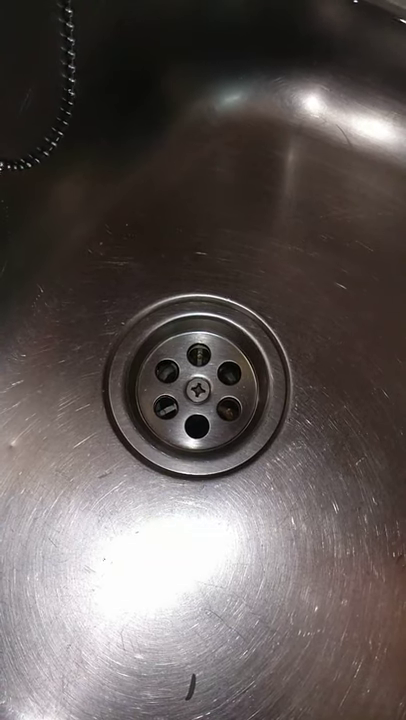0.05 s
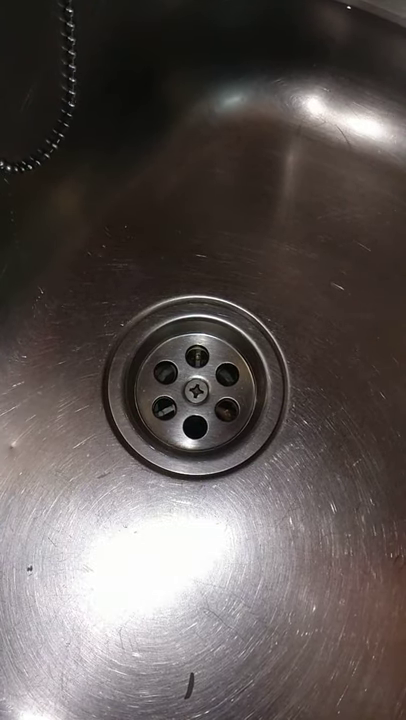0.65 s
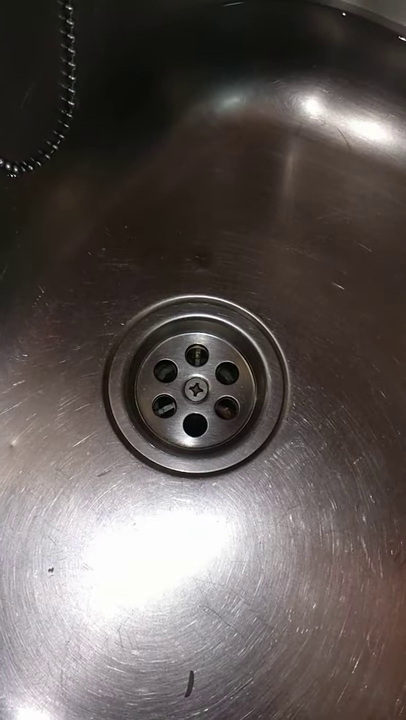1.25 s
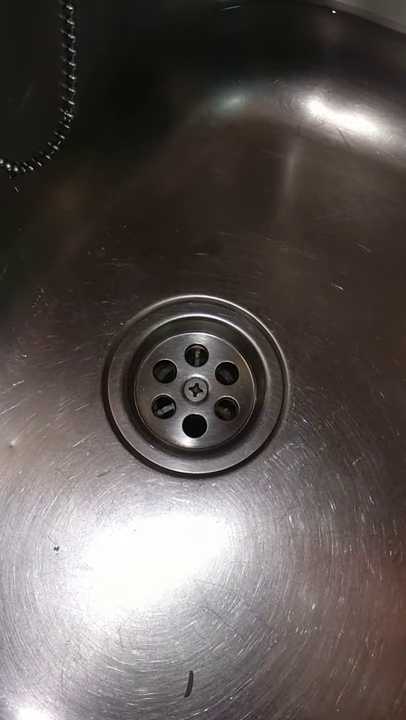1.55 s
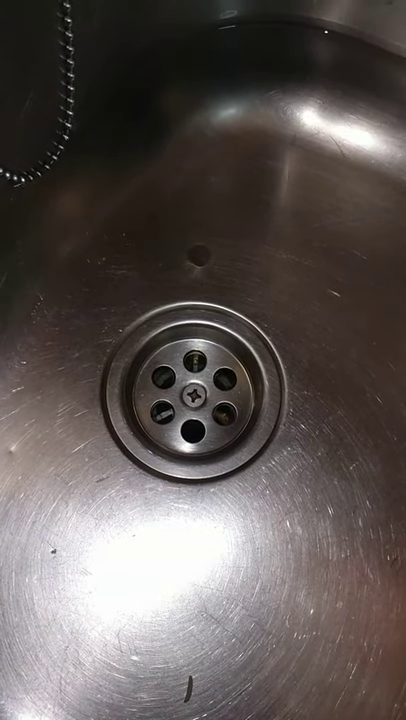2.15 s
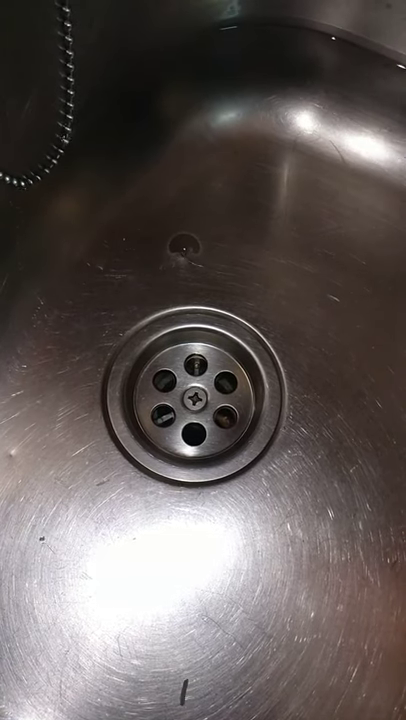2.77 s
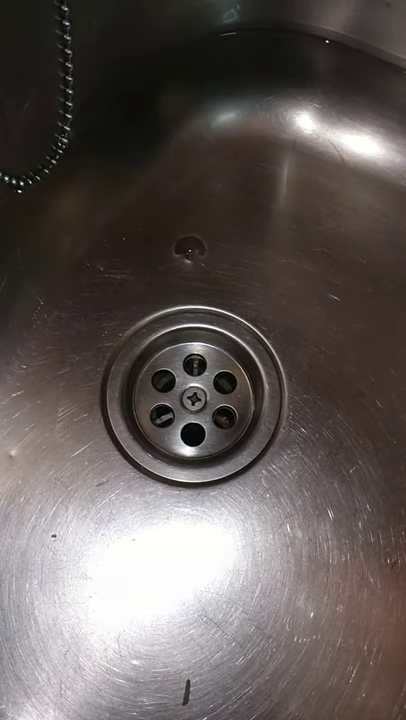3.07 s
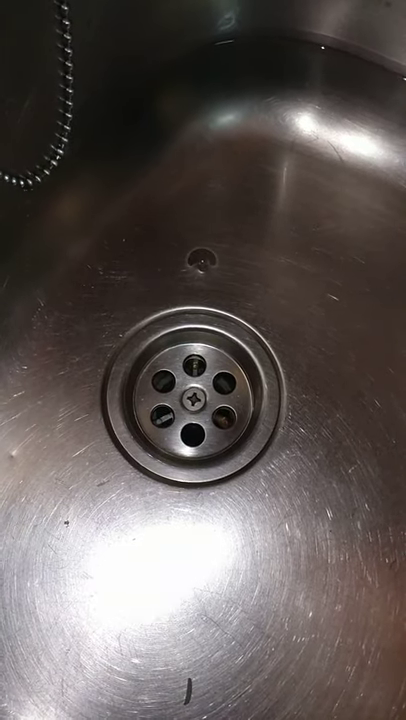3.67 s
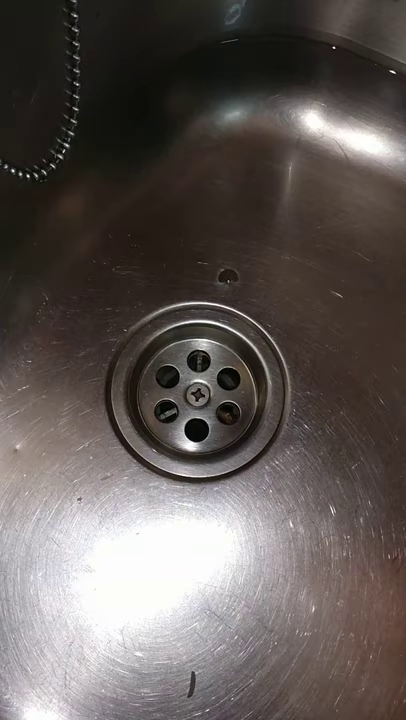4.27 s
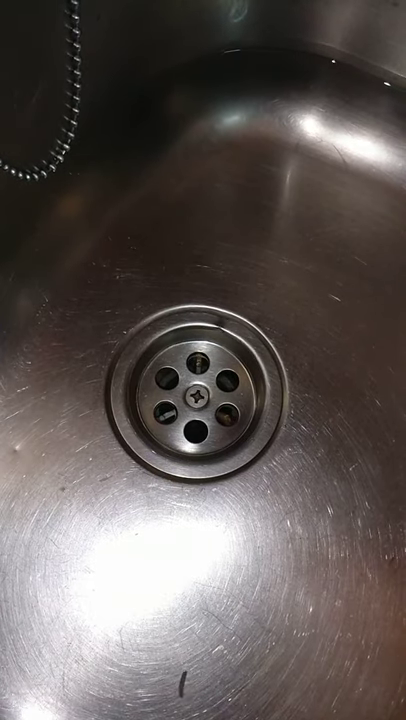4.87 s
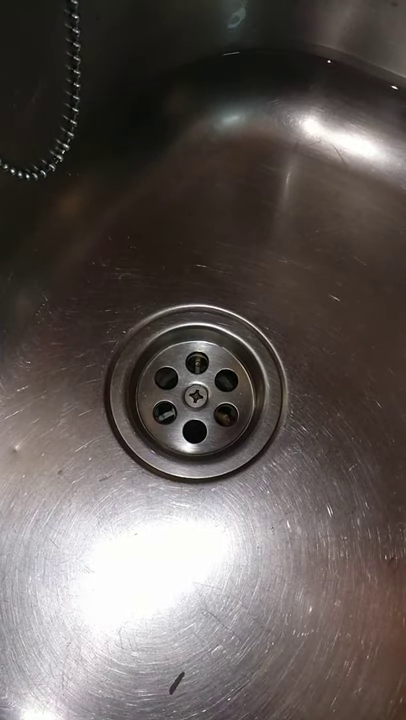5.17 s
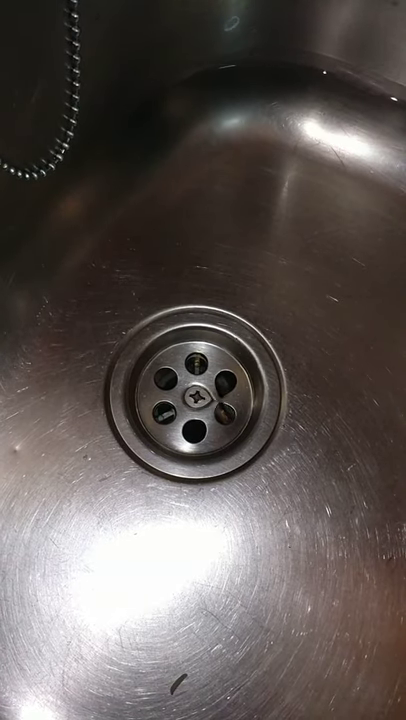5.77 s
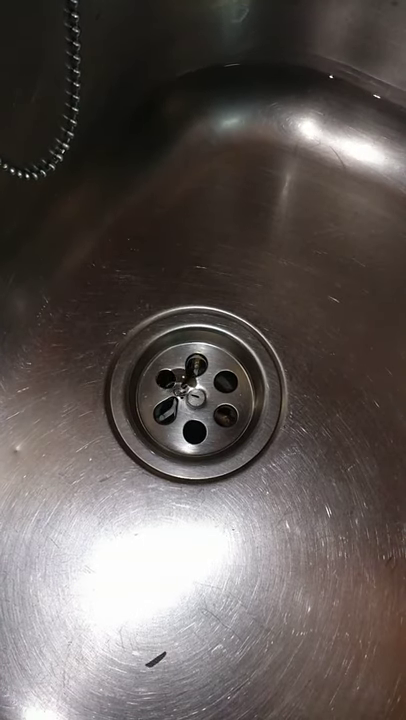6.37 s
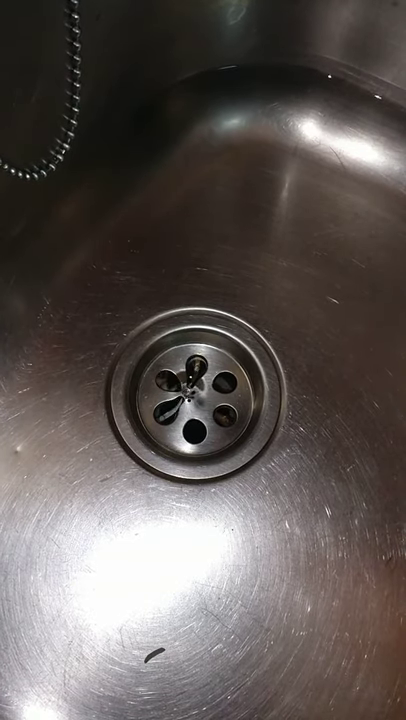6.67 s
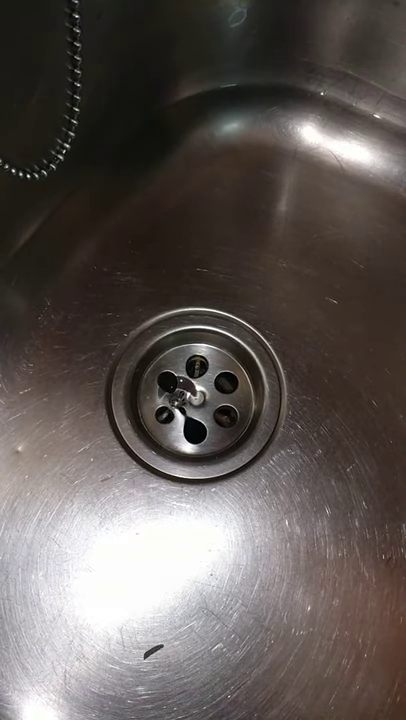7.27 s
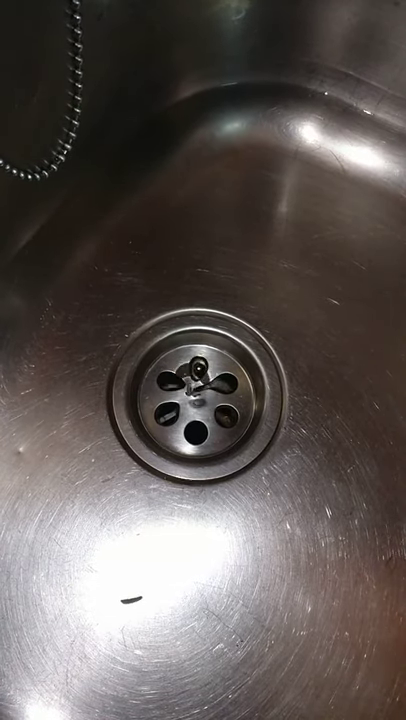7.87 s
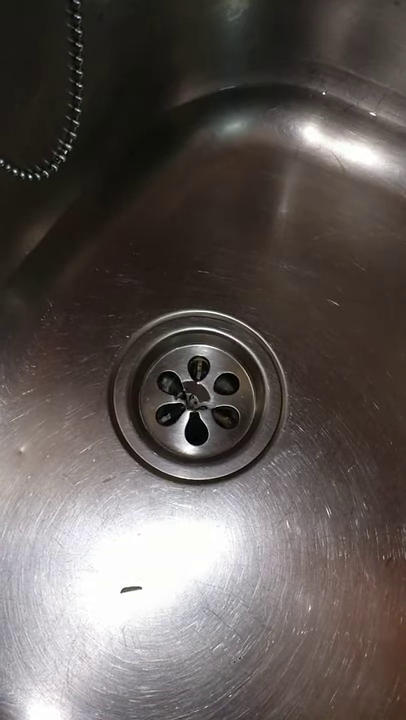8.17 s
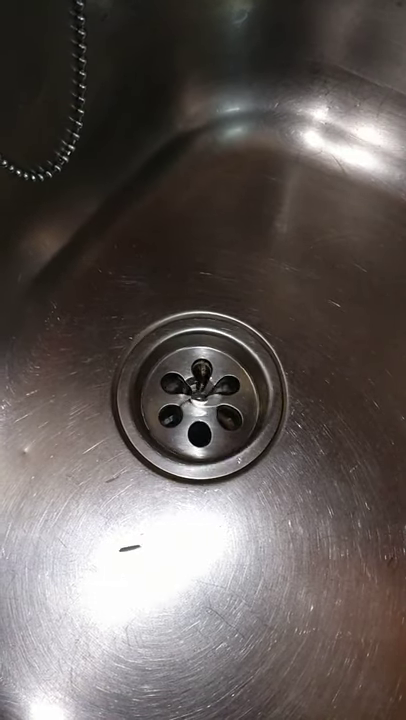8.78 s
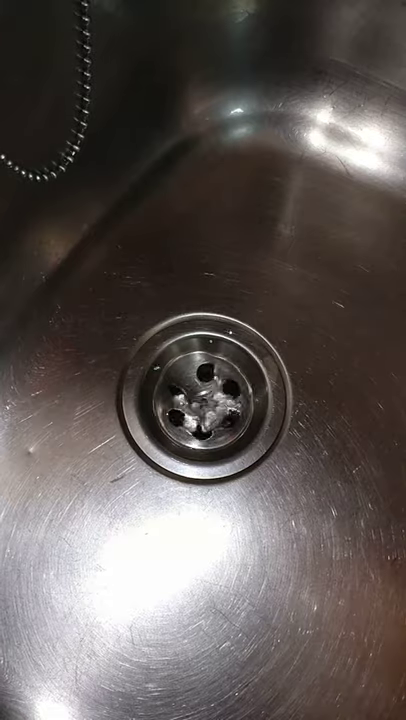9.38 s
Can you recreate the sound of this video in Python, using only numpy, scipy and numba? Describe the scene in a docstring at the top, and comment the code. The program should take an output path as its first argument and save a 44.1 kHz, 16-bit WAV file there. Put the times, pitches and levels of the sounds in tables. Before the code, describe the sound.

A steel sink drains quietly until a vortex starts sucking air in hissing slurps, with snapping bubbles, wavering groans and a final gurgle.

```python
"""A low rumble and a rustle, with a few drips: close above a steel sink, the last water runs down the
covered drain. After six seconds a vortex reaches the strainer and sucks air in fits. Its neck flutters a
few hundred times a second, spitting spray, ringing the air funnel and twice locking into a groan.
Bubbles snap, mostly between the fits, and at last the pipe gurgles wide open. The steel walls answer
at once; the kitchen behind them is faint."""
import sys
import numpy as np
from scipy import signal
from scipy.fft import rfft, irfft, next_fast_len
from scipy.io import wavfile
from scipy.ndimage import uniform_filter1d, map_coordinates
from numba import njit

SR = 44100
rng = np.random.default_rng(int(sys.argv[2]) if len(sys.argv) > 2 else 0)


def to_wav(sig):
    """Store sig (one row per channel, or 1-D mono) as 16-bit WAV at the path in sys.argv[1].

    Samples outside -1..1 are clipped; the rate is SR.
    """
    pcm = np.clip(np.atleast_2d(sig), -1, 1) * 32767
    pcm = np.round(pcm).astype(np.int16)
    wavfile.write(sys.argv[1], SR, pcm.T)  # frames by channels


N = 424683

# fits in which the vortex stays open: (start [s], end [s], spray [dB], funnel ring [dB], splash [dB],
# splash build-up [s], gurgle [dB], flutter rate [Hz], roughness [0-1])
FITS = [(6.339, 6.444, -34, -39.5, -57, .05, -72, 482.7, 0.25),
        (6.508, 6.812, -27.5, -34.5, -40, 0.29, -60, 458.6, 0.15),
        (6.961, 7.7, -27, -25.5, -28, 0.29, -39.5, 340.3, 0.66),
        (7.863, 8.115, -28, -25, -31, 0.013, -35.5, 329.8, .8),
        (8.149, 8.945, -27, -26.5, -27.5, 0.02, -28.5, 339.8, .8),
        (9.305, 9.635, -27.5, -32, -24.5, 0.0028, -22.5, 338.6, 0.75)]
# colours of water swishing and splashing in the pipe: (frequency [Hz], gain [dB])
SWISH = [(500, -18), (950, -2), (1950, -4), (2170, 4), (2400, -2), (5400, -9.5), (7200, -19.5),
         (16000, -30)]
SPLASH = [(240, -43.5), (390, -11), (550, -12.5), (710, -4), (1200, 0.5), (1450, -6.5), (1780, -7),
          (2050, 0.5), (3000, -5), (3900, -8), (7300, -14.5), (9000, -43)]
# the drain's balance at the microphones: (frequency [Hz], left minus right [dB])
DRAIN_TILT = [(200, 0), (700, 5.5), (1300, -0.5), (4400, -5), (7000, 1), (8500, 14.5), (10000, 14),
              (13000, 11.5)]
# the flutter locked into a wavering note: (time [s], pitch [Hz], level of the fundamental [dB])
FIRST_GROAN = [(7.04, 395.5, -48), (7.19, 404.7, -44), (7.305, 422.3, -39.5), (7.335, 333.2, -32),
               (7.355, 313, -52), (7.385, 305, -25), (7.425, 294.4, -26.5), (7.46, 364.8, -27.5),
               (7.495, 360.8, -33), (7.53, 439, -41), (7.575, 375, -36.5), (7.61, 461.2, -45)]
SECOND_GROAN = [(8.17, 432, -34), (8.22, 391.8, -37.5), (8.27, 358.2, -30), (8.335, 323.2, -24.5),
                (8.372, 312.1, -16), (8.415, 374.7, -27.5), (8.455, 323, -20), (8.495, 360.5, -22.5),
                (8.52, 303.6, -19.5), (8.555, 292, -20), (8.58, 352, -22), (8.63, 328.2, -40)]
# both groans: (curve [table], level of the overtones [dB])
GROANS = [(FIRST_GROAN, -39), (SECOND_GROAN, -34)]
GROAN_RAMP_S = .04


def amp(db):
    return 10 ** (np.asarray(db) / 20)


def unit(x):
    """Scale to an rms of 1, taken on the mean of the channels."""
    return x / np.sqrt(np.mean(np.atleast_2d(x).mean(0) ** 2) + 1e-20)


def along(points, hz):
    """Read (frequency [Hz], value) points on a log axis."""
    knots_hz, values = np.transpose(points)
    return np.interp(np.log(hz + 1), np.log(knots_hz + 1), values)


def curves(rows):
    """One value per sample for each column after the time."""
    times, *columns = np.transpose(rows)
    return [np.interp(np.arange(N) / SR, times, column) for column in columns]


def rise(start, length):
    """0 before the start, then climbing to 1 over the length."""
    return np.clip((np.arange(N) / SR - start) / max(length, 1e-4), 0, 1)


def gate(spans, attack, release):
    """1 during each (start [s], end [s], ...) span, with a ramp at both ends."""
    return sum(rise(start, attack) * (1 - rise(end, release)) for start, end, *_ in spans)


def wobble(rate):
    """A smooth random curve, rate knots a second."""
    return map_coordinates(rng.standard_normal(int(N * rate / SR) + 4), [np.arange(N) * rate / SR])


def filtered(x, response):
    """x through a complex response of frequency."""
    size = next_fast_len(N + SR // 2)
    return irfft(rfft(x, size) * response(np.fft.rfftfreq(size, 1 / SR)), size)[..., :N]


def coloured(x, spectrum):
    """A causal filter shaped by (frequency [Hz], gain [dB]) points."""
    def response(hz):
        cepstrum = irfft(np.log(np.maximum(amp(along(spectrum, hz)), 1e-5)))
        cepstrum[1:len(cepstrum) // 2] *= 2
        cepstrum[len(cepstrum) // 2 + 1:] = 0
        return np.exp(rfft(cepstrum))
    return filtered(x, response)


def resonant(x, modes, polarity=-1):
    """x through steady resonances; neighbours alternate in sign unless the polarity is 1."""
    def response(hz):
        return sum(polarity ** k * amp(db) * 1j * hz * width / (centre ** 2 - hz ** 2 + 1j * hz * width)
                   for k, (centre, width, db) in enumerate(modes))
    return filtered(x, response)


@njit
def ringing(x, centre_hz, width_hz):
    """A stereo signal through one gliding resonance of peak gain 1."""
    radius = np.exp(-np.pi * width_hz / SR)
    feedback = 2 * radius * np.cos(2 * np.pi * centre_hz / SR)
    out = np.zeros(x.shape)
    for side in range(2):
        for i in range(2, x.shape[1]):
            drive = (1 - radius) * (x[side, i] - x[side, i - 2])
            out[side, i] = drive + feedback[i] * out[side, i - 1] - radius ** 2 * out[side, i - 2]
    return out


def panned(pair, tilt):
    """Lean each frequency toward the left or the right microphone."""
    return filtered(pair, lambda hz: amp(np.outer([.5, -.5], along(tilt, hz))))


def placed(pair, alike, tilt):
    """Two unrelated signals become left and right with a given likeness and balance, at rms 1."""
    def weights(hz):
        turn = np.arccos(np.clip(along(alike, hz), -1, 1)) / 2
        return np.array([np.cos(turn), np.sin(turn)])
    mid, side = filtered(pair, weights)
    return unit(panned(np.array([mid + side, mid - side]), tilt))


def echo_cloud(t, t60):
    """A dying cloud of echoes for each side, of energy about 1."""
    cloud = rng.standard_normal((2, len(t))) * amp(-60 * t / t60)
    return cloud / np.linalg.norm(cloud[0])


def basin(x, wall_db, wall_t60, room_db):
    """From drain to microphones: the direct sound, the near steel walls, the kitchen farther off."""
    t = np.arange(SR // 3) / SR
    echo = amp(wall_db) * echo_cloud(t, wall_t60) + amp(room_db) * echo_cloud(t, t60=0.24)
    echo[[0, 1], [0, 8]] += 1  # the direct sound reaches the right side 8 samples later
    heard = signal.fftconvolve(np.atleast_2d(x), echo, axes=1)[:, :N] / np.linalg.norm(echo[0])
    return panned(heard, DRAIN_TILT)


def bubbles(count, centre_hz, spread, life_cycles, size_db):
    """Bubbles scattered in time: each rings for some cycles and rises a little in pitch."""
    start = rng.integers(0, N, (count, 1))
    pitch, size = rng.standard_normal((2, count, 1))
    hz = np.clip(centre_hz * np.exp(spread * pitch), 300, 9000)
    t = np.arange(SR // 30) / SR
    age = hz * t / life_cycles
    envelope = amp(size_db * np.minimum(size, 2) - 30 * age)
    rings = envelope * np.sin(2 * np.pi * hz * t * (1 + .06 * np.minimum(age, 2)))
    return unit(np.bincount((start + np.arange(len(t))).ravel(), rings.ravel(), N)[:N])


def flow():
    """Under the sink the full pipe rumbles in lumps; water rustles with tiny bubbles and swishes."""
    # colours of the running water: (frequency [Hz], gain [dB])
    rumble_colour = [(25, -30), (35, -14.5), (62, 5), (80, -2.5), (107, 3), (150, -6.5), (200, -12.5),
                     (270, -17), (309, -11.5), (382, -29), (600, -30), (1200, -70)]
    rustle_colour = [(280, -32), (440, -8), (492, 1.5), (560, -14.5), (680, -4), (1210, 2.5), (1580, -4.5),
                     (2200, -1), (6060, -13), (7690, -23.5), (10200, -13.5), (12500, -27.5), (16000, -32.5)]
    # its width at the microphones: (frequency [Hz], left-right likeness [0-1])
    alike = [(150, 0.97), (380, 0.64), (950, 0)]
    # its balance: (frequency [Hz], left minus right [dB])
    tilt = [(150, -0.5), (950, -4), (6000, -1.5), (15000, 21.5)]
    # brief swells of the flow: (peak time [s], half length [s], rumble gain [dB], swish level [dB])
    swells = [(0.245, 0.15, 2, -52), (4.407, 0.058, 1, -49.5), (4.897, 0.19, 2.5, -54.5),
              (5.35, 0.24, 2, -51), (6.226, 0.18, 1, -52.5)]
    t = np.arange(N) / SR
    stirred = rise(FITS[0][0], 2.7)  # once the vortex is through, the pipe stays stirred up
    rumble_db, rustle_db, swish_gain = -44 + 6.8 * stirred, -53 + 7.9 * stirred, 0
    for peak, half_length, gain_db, swish_db in swells:
        swell = np.exp(-((t - peak) / half_length) ** 2)
        rumble_db += swell * gain_db
        swish_gain += swell * amp(swish_db)
    lumps = rng.standard_normal((2, N)) * amp(0.22 * wobble(22))
    rumble = placed(coloured(lumps, rumble_colour), alike, tilt)
    grains = rng.standard_normal((2, N)) * amp(0.61 * wobble(22) + 1.56 * wobble(240))
    trickle = np.array([bubbles(count=900, centre_hz=4600, spread=0.4, life_cycles=18, size_db=4)
                        for side in range(2)])
    rustle = placed(coloured(grains + amp(-13.5) * trickle, rustle_colour), alike, tilt)
    flicker = rng.standard_normal((2, N)) * amp(2.5 * wobble(70))
    swish = placed(coloured(flicker, SWISH), alike, tilt)
    return amp(rumble_db) * rumble + amp(rustle_db) * rustle + swish_gain * swish


def plinks(rows, t60, tick_db, tick_t60, tick_colour):
    """A drop or a bubble in the pipe: a wet tick and a short rising ring."""
    t = np.arange(SR // 15) / SR
    ticks, rings = np.zeros((2, N + SR))
    for start, db, hz in rows:
        at = round(start * SR)
        ticks[at:at + len(t)] += amp(db + tick_db - 60 * t / tick_t60) * rng.standard_normal(len(t))
        rings[at:at + len(t)] += amp(db - 60 * t / t60) * np.sin(2 * np.pi * hz * t * (1 + 1.4 * t))
    return basin(coloured(ticks[:N], tick_colour) + rings[:N], wall_db=-1.5, wall_t60=0.12, room_db=-3)


def drips():
    """Single drops tick faintly down in the pipe."""
    # drops: (time [s], level [dB], ring [Hz])
    drops = [(.826, -39.5, 3760), (1.459, -45, 3820), (1.9096, -39, 2600), (1.9974, -39, 2310),
             (4.0936, -40, 2540), (5.207, -42, 6000), (5.4605, -41, 5200), (5.7314, -36, 2440)]
    return plinks(drops, t60=0.041, tick_db=8, tick_t60=.017, tick_colour=SWISH)


def gulps():
    """A big air pocket in the trap swells quickly into a low note and dies away, dead centre."""
    # air pockets: (start [s], length [s], peak level [dB], pitch [Hz])
    pockets = [(4.8, 0.1, -37, 128.4), (5.13, 0.27, -38, 137.6), (6.825, 0.13, -26, 99.4),
               (7.205, 0.041, -30, 196), (7.63, 0.14, -29, 120.2), (8.28, 0.068, -27.5, 284),
               (8.3, .11, -23, 135.3), (8.648, 0.097, -17.5, 131.4), (8.725, 0.087, -20.5, 127.5),
               (8.875, 0.082, -20.5, 133.8), (9.305, 0.0707, -20.5, 124.1), (9.405, 0.071, -21.5, 126.7),
               (9.485, .06, -24, 128), (9.598, .07, -26, 115)]
    out = np.zeros(N + SR)
    for start, length, db, hz in pockets:
        t = np.arange(int(length * SR)) / SR
        swell = np.sin(np.pi * (t / length) ** 0.72) ** 2
        out[round(start * SR):][:len(t)] += amp(db) * swell * np.sin(2 * np.pi * hz * t)
    return out[:N]


def whistle(peak_s=6.11, half_length_s=0.11, level_db=-53):
    """The pipe sings faintly just before the vortex breaks through."""
    # its singing resonances: (frequency [Hz], width [Hz], gain [dB])
    modes = [(875, 32, -2), (1130, 25, 3)]
    swell = np.exp(-((np.arange(N) / SR - peak_s) / half_length_s) ** 2)
    return amp(level_db) * swell * unit(resonant(rng.standard_normal(N), modes))


def current_fit():
    """The columns of the latest fit, one value per sample."""
    rows = np.array(FITS)
    latest = np.maximum(np.searchsorted(rows[:, 0], np.arange(N) / SR) - 1, 0)
    return rows[latest].T


def flutter(wander=.09, groan_roughness=.1):
    """The vortex neck's running count of cycles and its roughness: ragged, but smooth in a groan."""
    # the groan cracks into ragged flutter: (start [s], end [s])
    breaks = [(7.335, 7.37)]
    *_, rate_hz, rough = current_fit()
    rate_hz = rate_hz * np.exp(wander * wobble(14))
    for curve, _ in GROANS:
        locked = gate([(curve[0][0] - GROAN_RAMP_S, curve[-1][0])], GROAN_RAMP_S, GROAN_RAMP_S)
        rate_hz = rate_hz + locked * (curves(curve)[0] - rate_hz)
        rough = rough + locked * (1 - gate(breaks, .01, .01)) * (groan_roughness - rough)
    rough = np.clip(rough, 0, 1)
    jitter = .6 * rough ** 1.5 * wobble(260)
    return np.cumsum(rate_hz * np.exp(jitter)) / SR, rough


def airflow(release_s=0.012):
    """Strength of the spray and of the funnel's ring: a steady draught with slurps on top."""
    # hard slurps: (start [s], length [s], attack [s], spray [dB], funnel [dB], fade over length [dB])
    slurps = [(6.339, 0.011, 0.0033, -19, -44, 7), (6.358, 0.085, 0.058, -22, -27.5, 2.5),
              (6.512, 0.3, 0.11, -17.5, -23, 3), (6.96, 0.28, 0.011, -20.5, -21, 1),
              (7.266, 0.16, 0.078, -23, -18.5, 0.5), (7.512, 0.06, 0.011, -27.5, -18.5, -2.5),
              (7.608, 0.084, 0.011, -23, -20, -3), (7.859, 0.063, 0.01, -19.5, -16, 0),
              (7.928, 0.12, 0.022, -20, -17.5, -1), (8.145, 0.17, 0.004, -27, -16, 10),
              (8.722, 0.15, 0.019, -27.5, -19.5, 0), (8.907, 0.027, .012, -23.5, -14, 4.5)]
    t = np.arange(N) / SR
    spray, funnel = amp(current_fit()[2:4])
    for start, length, attack, spray_db, funnel_db, fade_db in slurps:
        tail = np.exp(-np.maximum(t - start - length, 0) / release_s)
        slurp = rise(start, attack) * amp(-fade_db * rise(start, length)) * tail
        spray = np.hypot(spray, amp(spray_db) * slurp)
        funnel = np.hypot(funnel, amp(funnel_db) * slurp)
    return spray, funnel


def spits(cycles, rough, life_s, scatter_db, hiss, shared):
    """Each closing of the neck spits a burst of noise; rough flutter makes the bursts uneven."""
    closings = np.flatnonzero(np.diff(np.floor(cycles)))
    spread_db = 1.5 + scatter_db * np.sqrt(rough[closings])
    size = amp(spread_db * np.clip(rng.standard_normal(len(closings)), -2, 2))
    kicks = np.zeros(N)
    kicks[closings] = size / np.sqrt(uniform_filter1d(size ** 2, size=14))
    kicks /= np.sqrt(np.gradient(cycles))  # equal power at any flutter rate
    bursts = signal.lfilter([1], [1, -np.exp(-1 / (life_s * SR))], kicks)
    noise = rng.standard_normal((2, N)) + shared * rng.standard_normal(N)
    return unit((unit(bursts) + hiss) * noise)


def core_echoes(x, round_trip_s=.0021, drift=.07, reflected=0.46):
    """Sound bounces up and down the air core, whose drifting length sweeps a comb of resonances."""
    now = np.arange(N)
    trip = SR * round_trip_s * np.exp(drift * wobble(7))
    return unit(sum(reflected ** k * x[:, np.clip(np.rint(now - k * trip).astype(int), 0, N - 1)]
                    for k in range(4)))


def suction(cycles, rough, ring_width_hz=745, bubbles_db=-7.5):
    """Close up at the strainer, bursts hiss as spray and ring the air funnel and the strainer cup."""
    # the funnel rings high when it is short and sinks as it deepens: (time [s], ring [Hz])
    funnel_pitch = [(6.345, 5900), (6.39, 5700), (6.45, 5500), (6.53, 4820), (6.72, 4320), (6.82, 4700),
                    (6.96, 5600), (7.054, 4720), (7.22, 4720), (7.35, 3930), (7.55, 4200), (7.68, 4600),
                    (7.92, 4390), (7.945, 5160), (7.985, 4172), (8.05, 4792), (8.15, 4750), (8.2, 5400),
                    (8.7, 5662), (8.83, 6182), (8.95, 5700), (9.4, 4840)]
    # colours of the spray and of the funnel heard in the bowl: (frequency [Hz], gain [dB])
    spray_colour = [(4000, -19), (6800, -43), (7460, -10), (8300, 1), (12500, -1), (15200, 2), (16000, -40)]
    bowl_colour = [(1200, -2.5), (3000, 1), (6400, -4), (9000, -12)]
    # resonances of the strainer cup: (frequency [Hz], width [Hz], gain [dB])
    cup_modes = [(3977, 160, 0.5), (4200, 110, -2.5), (4530, 110, 7), (4940, 62, -13), (5210, 70, -23),
                 (5480, 220, 0), (5830, 130, -2)]
    spray_gain, funnel_gain = airflow()
    funnel_hz = curves(funnel_pitch)[0] * np.exp(.035 * wobble(30))  # its mouth keeps changing size
    bursts = core_echoes(spits(cycles, rough, life_s=0.00036, scatter_db=2.4, hiss=0.15, shared=2.3))
    octave = ringing(bursts, 2 * funnel_hz, width_hz=4100)
    spray = unit(coloured(bursts + 0.44 * octave, spray_colour))
    # small bubbles are torn off into the funnel
    torn = bubbles(count=2000, centre_hz=4400, spread=0.18, life_cycles=35, size_db=4)
    fizz = unit(ringing(np.array([torn, torn]), funnel_hz, ring_width_hz))
    ring = ringing(bursts, funnel_hz, ring_width_hz)
    cup = resonant(ring, cup_modes, polarity=1)
    funnel = unit(coloured(ring + cup, bowl_colour)) + amp(bubbles_db) * fizz
    sucking = spray_gain * amp(-2.0 + 0.58 * wobble(25)) * spray
    sucking += funnel_gain * amp(-2.5 + 0.59 * wobble(40)) * funnel
    sucking *= gate(FITS, attack=0.00048, release=0.0066)
    return basin(sucking, wall_db=6, wall_t60=0.045, room_db=-8.0)


def waste_pipe(cycles, rough, build_db_per_s=14):
    """Below the strainer, falling water splashes and plops, and the pipe's air column gurgles."""
    # waste pipe resonances: (frequency [Hz], width [Hz], gain [dB])
    modes = [(137.6, 17, -0.5), (243, 26, -3), (301, 41, 2.5), (331.4, 32, 5)]
    # the drain's width at the microphones: (frequency [Hz], left-right likeness [0-1])
    alike = [(280, 0.92), (900, 0.84), (1400, 0.79), (2200, 0.12), (3000, 0.83)]
    t = np.arange(N) / SR
    start, end, _, _, splash_db, build_s, full_db, *_ = current_fit()
    gurgle_db = full_db + 1.0 - build_db_per_s * np.maximum(end - t, 0)
    falling = amp(splash_db + 5.0) * np.clip((t - start) / build_s, 0, 1)
    drops = spits(cycles, rough, life_s=0.00061, scatter_db=2, hiss=1.0, shared=0)
    splash = falling * placed(coloured(drops, SPLASH), alike, DRAIN_TILT)
    splash *= amp(-7 * (2.0 - rough))  # a smooth vortex splashes less than a ragged one
    air_colour = [(30, 9), (100, 5.0), (250, -4.0), (360, -3.0), (600, 4.0), (1500, -70)]
    air = coloured(rng.standard_normal((2, N)), air_colour)
    gurgle = amp(gurgle_db) * placed(resonant(air, modes), alike, DRAIN_TILT)
    plops = np.array([bubbles(count=2000, centre_hz=1002, spread=0.504, life_cycles=31, size_db=7.0)
                      for side in range(2)])
    plops = amp(full_db - 12) * placed(plops, alike, DRAIN_TILT)  # loud only in a hard gurgle
    return gate(FITS, attack=0.0025, release=0.018) * (splash + plops + gurgle)


def snaps():
    """A film bursting at the strainer gives a bright crack and a short ring of its cavity; once, at 8.647 s,
    the air funnel squirts with the same crack and ring."""
    # single bubbles, and at 8.647 s a squirt of the funnel: (time [s], level [dB], ring [Hz])
    films = [(6.839, -10, 5330), (6.961, -5.5, 5360), (7.719, 2, 5925), (7.793, -4, 5400),
             (7.803, -2, 4750), (7.81, 1.5, 4360), (7.825, 0, 6120), (8.146, 2.5, 4677), (8.647, 1, 4394),
             (8.898, -8, 6050), (9.013, -6, 6830), (9.039, 3, 5800), (9.084, 0, 10430), (9.09, -5, 10100),
             (9.104, -3.5, 2320)]
    t = np.arange(SR // 20) / SR
    cracks, rings = np.zeros((2, N))
    for start, db, ring_hz in films:
        at = round(start * SR)
        cracks[at:at + len(t)] += amp(db - 10 - 60 * t / 0.0069) * rng.standard_normal(len(t))
        rings[at:at + len(t)] += amp(db - 5.5 - 60 * t / 0.007) * np.sin(2 * np.pi * ring_hz * t)
    crack_colour = [(200, -38), (1000, -4.0), (4500, 3.5), (7000, -39), (9000, 6.5), (15000, 3.5)]
    return basin(coloured(cracks, crack_colour) + rings, wall_db=1.0, wall_t60=0.055, room_db=-11.0)


def groans(cycles):
    """The air column follows the flutter; its overtones flare where they cross the pipe's resonances."""
    # the pipe's colour on the overtones: (frequency [Hz], gain [dB])
    pipe_colour = [(500, -20), (725, 2), (930, -16.5), (1200, 1), (1450, -12), (2150, 0), (2700, -4.5)]
    overtones = sum(amp(3 * wobble(45)) * np.sin(2 * np.pi * k * cycles + .3 * wobble(70))
                    for k in range(2, 7))
    overtones = unit(coloured(overtones, pipe_colour))
    out = np.zeros(N)
    for curve, overtone_db in GROANS:
        _, level_db = curves(curve)
        fundamental = amp(level_db + 1.5 * wobble(60)) * np.sin(2 * np.pi * cycles)
        sounding = gate([(curve[0][0], curve[-1][0] - GROAN_RAMP_S)], GROAN_RAMP_S, GROAN_RAMP_S)
        out += sounding * (fundamental + amp(overtone_db) * overtones)
    return out


def pops():
    """Big bubbles burst with a splash in the wide-open pipe."""
    # bursts: (time [s], level [dB], ring [Hz])
    bursts = [(9.307, -18, 1197), (9.322, -20.5, 726), (9.3457, -19, 1575), (9.383, -13, 1271),
              (9.4096, -14.5, 2403), (9.425, -16.5, 950), (9.4679, -18, 2090), (9.486, -20, 1150),
              (9.549, -22, 1150)]
    return plinks(bursts, t60=0.04, tick_db=7, tick_t60=0.075, tick_colour=SPLASH)


def scene():
    """Steady flow under the sink, with the vortex and its bubbles in front."""
    right_lag_s = 0.00013  # the pipe's sound reaches the right microphone later
    cycles, rough = flutter()
    pipe = waste_pipe(cycles, rough) + groans(cycles)
    pipe = filtered(pipe, lambda hz: np.exp(-2j * np.pi * np.outer([0, right_lag_s], hz)))
    return flow() + drips() + gulps() + whistle() + suction(cycles, rough) + pipe + snaps() + pops()


def record(dry):
    """The recorder rounds off the highest peaks and keeps nothing above its band limit."""
    rounded = dry / (1 + np.abs(dry) ** 6) ** (1 / 6)
    return filtered(rounded, lambda hz: hz < 15900)


dry = scene()
out = record(dry)
to_wav(out)
```